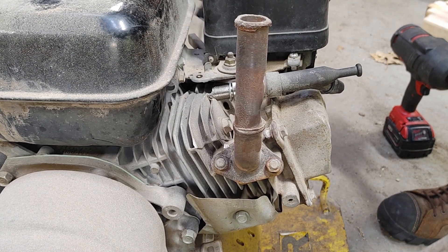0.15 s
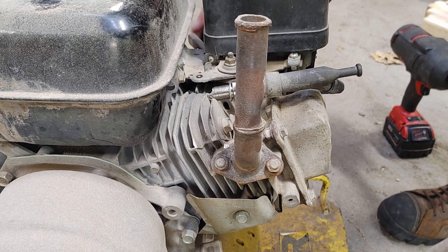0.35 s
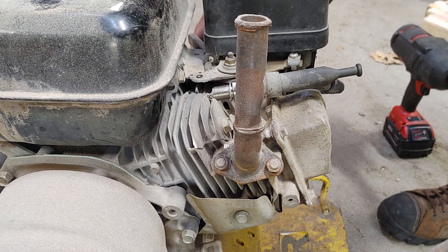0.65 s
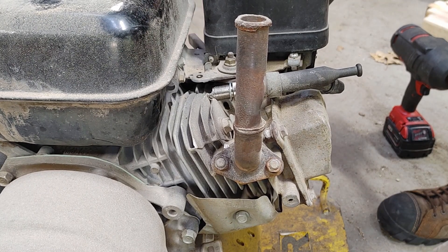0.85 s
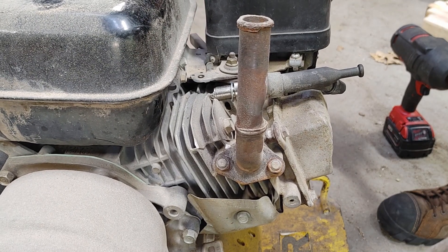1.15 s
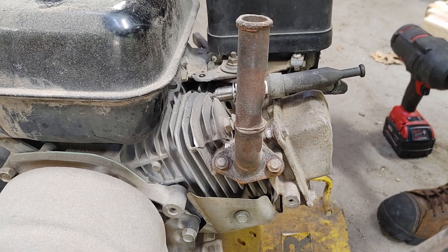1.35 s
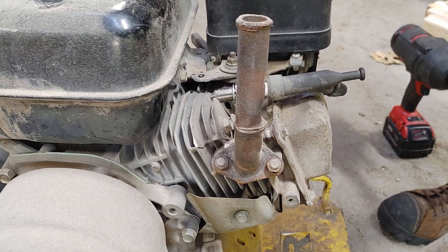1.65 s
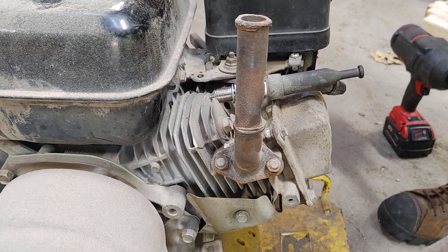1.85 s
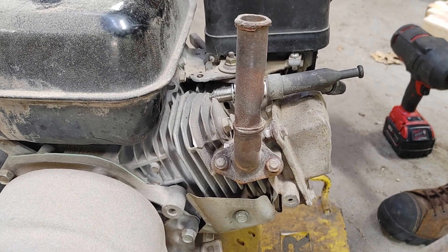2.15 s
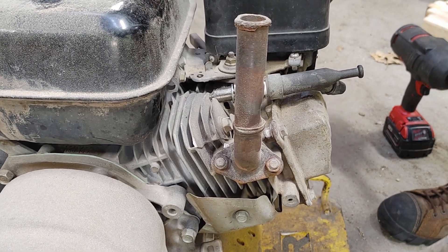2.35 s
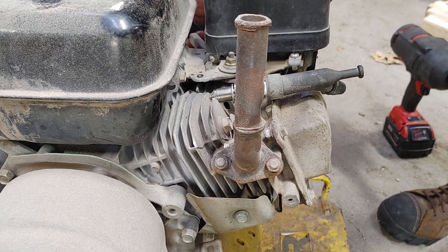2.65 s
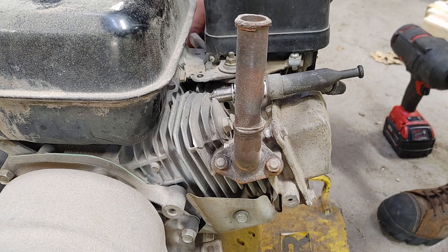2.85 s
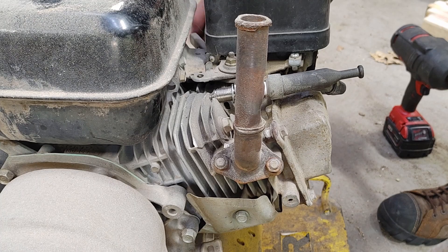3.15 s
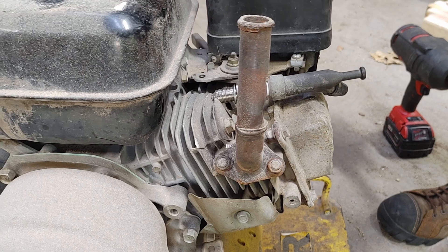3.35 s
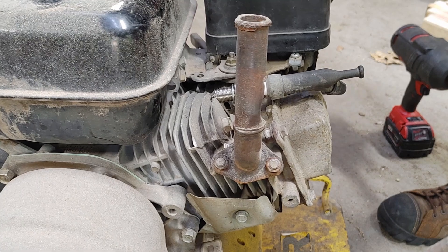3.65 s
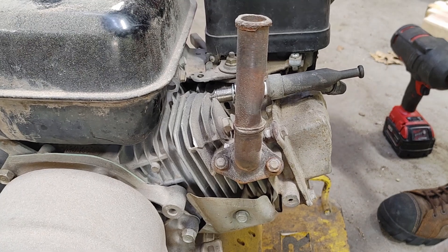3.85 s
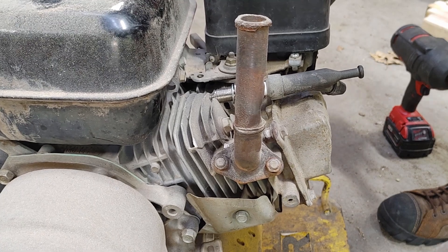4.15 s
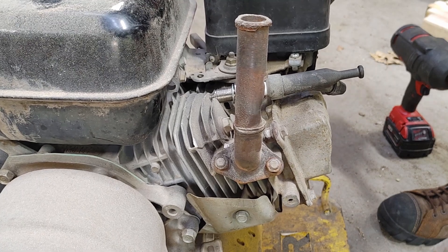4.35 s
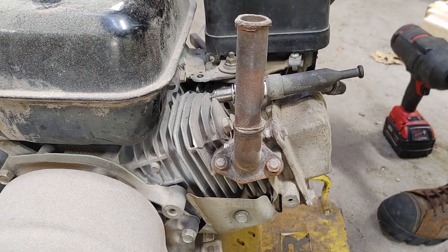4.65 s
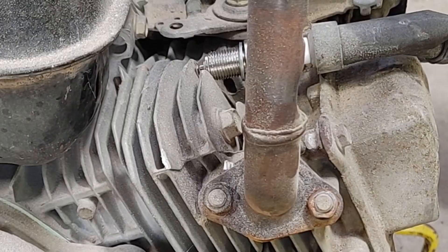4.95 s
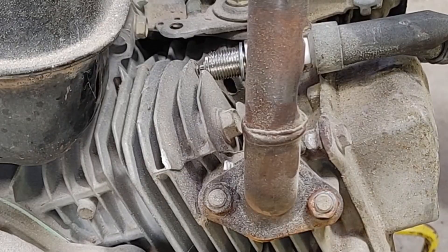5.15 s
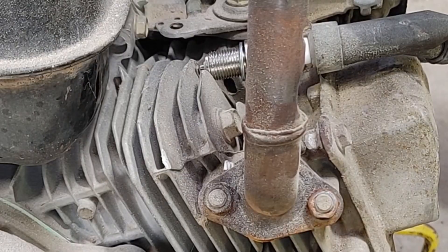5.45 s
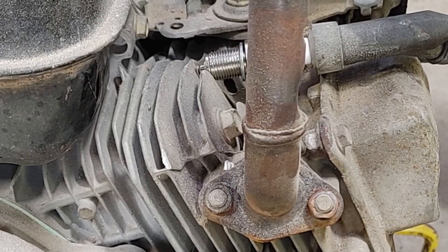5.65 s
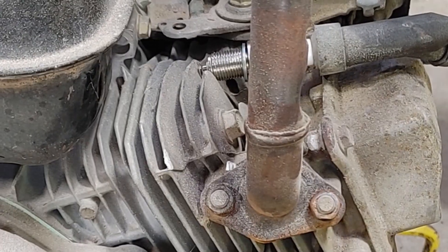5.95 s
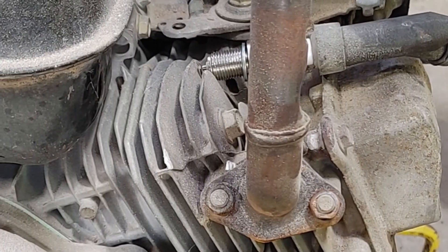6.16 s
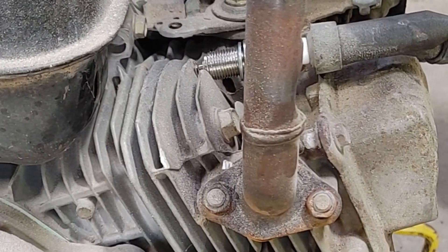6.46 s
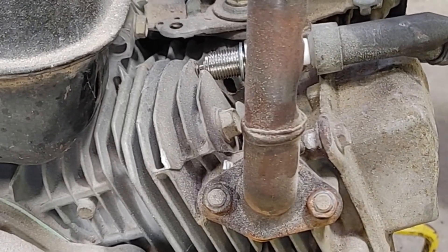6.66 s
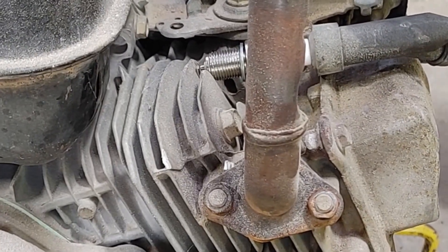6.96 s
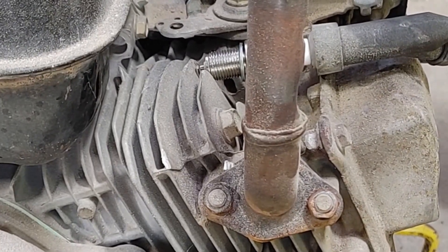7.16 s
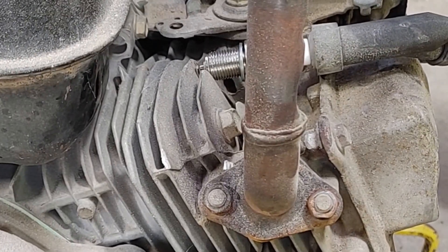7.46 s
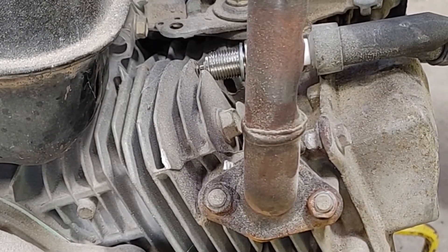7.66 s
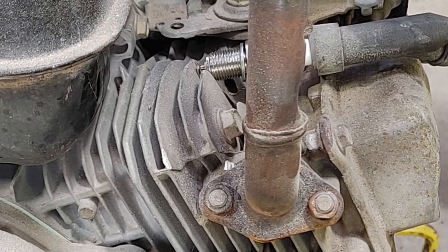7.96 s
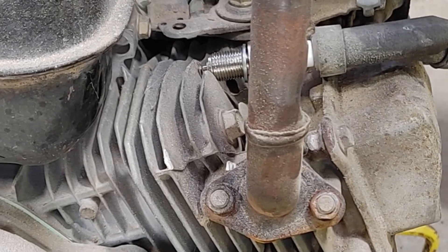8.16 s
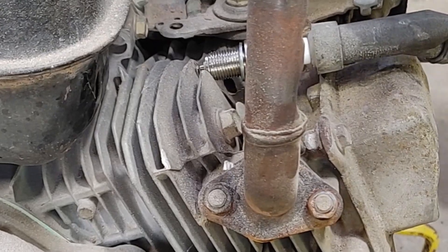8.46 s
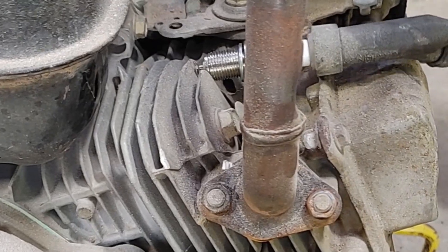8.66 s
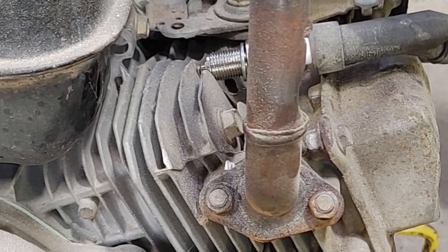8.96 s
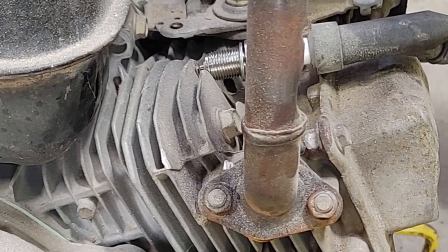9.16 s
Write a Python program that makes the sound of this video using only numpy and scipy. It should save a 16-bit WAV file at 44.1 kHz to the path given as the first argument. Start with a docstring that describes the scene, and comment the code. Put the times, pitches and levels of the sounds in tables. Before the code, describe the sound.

A recoil starter is yanked four times on a small engine that never fires, each pull a metallic clash, rattling whirr and clinking coast-down in a workshop.

```python
"""A small four-stroke engine is pulled over four times by its recoil starter and never fires.
Place: a workshop with a short reverberation and faint building rumble; a two-microphone pair, left first.
The rope tightens with a knock, pawls clash into the steel cup, and the crank whirrs and coasts down.
Each cycle gives a metallic rasp, a few clinks and a soft puff from the open exhaust stub;
the rewinding reel groans. Filtered random contacts make the noises; damped modes make the ringing."""
import sys
import numpy as np
from scipy import signal
from scipy.fft import rfft, irfft, next_fast_len
from scipy.io import wavfile

SR = 44100
rng = np.random.default_rng(int(sys.argv[2]) if len(sys.argv) > 2 else 0)


def bounce(signal):
    """Save signal as a 16-bit WAV file at the path given by the first command-line argument."""
    frames = np.transpose(np.atleast_2d(signal))
    limited = np.clip(frames, -1, 1)
    pcm = np.round(limited * 32767).astype(np.int16)
    wavfile.write(sys.argv[1], SR, pcm)


N = 410558
TIME = np.arange(N) / SR
AIR_DB = -67
CUTOFF_HZ = 16000
FULL_SPEED = 9  # crank cycles per s at which the engine's levels are given


def from_db(db):
    """Amplitude factor of a level in dB."""
    return 10 ** (np.asarray(db) / 20)


def rms_one(x):
    """Scale to an rms of 1."""
    return x / np.sqrt(np.mean(x ** 2) + 1e-20)


def at_hz(points, hz):
    """Read a spectrum on a log-frequency axis."""
    points = np.array(points)
    return np.interp(np.log(hz + 1e-3), np.log(points[:, 0]), points[:, 1])


def add(track, s, sound):
    """Mix a sound into the track from time s on."""
    i = max(round(s * SR), 0)
    track[i:i + len(sound)] += sound[:max(N - i, 0)]


def colour(x, spectrum, resonances=()):
    """Causal filter with a broad spectrum and resonant peaks; white noise keeps its power."""
    size = 2 * next_fast_len(N // 2 + SR // 4)
    hz = np.arange(size // 2 + 1) * SR / size
    db = at_hz(spectrum, hz)
    for centre_hz, width_hz, lift_db in resonances:
        db = db + lift_db / (1 + (2 * (hz - centre_hz) / width_hz) ** 2)
    # folding the cepstrum forward in time gives minimum phase
    cepstrum = irfft(np.log(rms_one(from_db(db))))
    causal = cepstrum * np.r_[1, np.full(size // 2 - 1, 2), 1, np.zeros(size // 2 - 1)]
    return irfft(rfft(x, size) * np.exp(rfft(causal)))[..., :N]


def ring(force, hz, t60):
    """Damped mode: a unit click sets a sine of height 1 ringing, down 60 dB after t60 seconds."""
    radius, angle = 10 ** (-3 / (t60 * SR)), 2 * np.pi * hz / SR
    return signal.lfilter([0, np.sin(angle)], [1, -2 * radius * np.cos(angle), radius ** 2], force + 1e-18)


def drift(rate, size=N):
    """Random wandering with spread near 1, through new values at rate per second."""
    knots = rng.standard_normal(4000)
    return np.interp(TIME[:size] * rate, np.arange(len(knots)), knots)


def contacts(per_s, spread_db):
    """Random tiny impacts of uneven strength, radiating differently in two directions; rms 1."""
    strength_db = spread_db * np.minimum(rng.exponential(1, N), 3)
    sizes = from_db(strength_db) * rng.choice([-1, 1], (2, N))
    return rms_one(sizes * (rng.random(N) < per_s / SR))


# rumble of the building: hz, level_db (per Hz)
AIR_COLOUR = [(25, -16.5), (70, 0), (110, -4.5), (180, -6.5), (300, -4.5), (520, -7), (900, -12),
              (1400, -19), (3000, -19.5), (7000, -28), (9000, -29), (16000, -21.5)]


def room_air(side_db=-8):
    """Faint steady rumble of the building: coloured noise, partly different at the two microphones."""
    mid, side = colour(rng.standard_normal((2, N)), AIR_COLOUR)
    return from_db(AIR_DB) * (mid + from_db(side_db) * side * [[1], [-1]])


# reverberation of the workshop: hz, t60_s
SHOP_T60 = [(100, 0.14), (500, 0.5), (2000, 0.11), (6000, 0.57), (15000, 0.098)]
# how alike the left and right microphones hear: hz, likeness (1 = the same)
LIKENESS = [(100, 0.45), (300, 0.54), (550, 1), (900, 0.15), (1500, 0.25), (2600, 0.044), (15000, 0.032)]


def workshop(pair, room_db, build_s=.008, lead_s=.00009):
    """Both microphones hear the bass more alike than the treble, left first; then the room answers."""
    size = next_fast_len(N)
    likeness = np.clip(at_hz(LIKENESS, np.arange(size // 2 + 1) * SR / size), -1, 1)
    shares = np.sqrt([(1 + likeness) / 2, (1 - likeness) / 2])
    common, apart = irfft(rfft(pair, size) * shares, size)[:, :N]
    right = np.interp(TIME - lead_s, TIME, common - apart)
    direct = np.array([common + apart, right])

    t, echoes = TIME[:SR * 3 // 4], 0
    for low_hz in 60 * 2 ** np.arange(9.):  # octave bands
        edges_hz = [low_hz, min(2 * low_hz, .45 * SR)]
        band = signal.butter(2, edges_hz, "band", fs=SR, output="sos")
        mid, side = signal.sosfilt(band, rng.standard_normal((2, len(t))))
        hz = low_hz * np.sqrt(2)
        alike = np.clip(at_hz(LIKENESS, hz), -1, 1)
        decay_s = at_hz(SHOP_T60, hz) / np.log(1000)
        tail = np.exp(-t / decay_s) * np.minimum(t / build_s, 1) / np.sqrt(decay_s * SR)
        spread = np.sqrt(1 + alike) * mid + np.sqrt(1 - alike) * side * [[1], [-1]]
        echoes = echoes + from_db(room_db) * tail * spread
    room = signal.fftconvolve(echoes, pair[:1], axes=1)[:, :N]
    return (direct + room) / np.sqrt(1 + from_db(room_db) ** 2)


# faint rustles of hand and rope: start_s, level_db
RUSTLES = [(0.037, -50), (.066, -55), (.11, -53), (0.14, -57), (0.589, -56), (2.949, -55.5), (4.668, -49.5),
           (4.915, -52), (5.241, -57.5), (5.46, -50), (5.495, -39), (7.095, -49), (7.19, -52), (7.294, -50),
           (7.411, -56.5), (7.669, -53.5)]


def rustles(rise_s=0.012, fade_s=0.022):
    """The hand shifts its grip and the rope brushes the shroud: brief swells of random contacts."""
    touch, t = np.zeros(N), TIME[:SR // 5]
    for s, db in RUSTLES:
        add(touch, s, from_db(db) * np.minimum(t / rise_s, 1) * np.exp(-t / fade_s))
    spectrum = [(200, 5.0), (1500, 2.5), (7000, -2.5), (8500, -8.5), (16000, -6.5)]  # hz, level_db
    return colour(touch * contacts(per_s=6500, spread_db=6.0), spectrum)


# thin squeaks of dry steel: start_s, length_s, first_hz, middle_hz, last_hz, level_db
SQUEAKS = [(3.796, .014, 9700, 13000, 15500, -30.5), (4.088, .04, 10400, 12800, 10300, -40.5),
           (6.191, .011, 10000, 12800, 15200, -29), (6.472, .037, 10200, 13500, 10200, -31)]


def squeaks(gain_db=0.0, waver=.03, rough_db=4.0):
    """The pitch of a squeak follows the sliding speed in one quick arc."""
    out = np.zeros(N)
    for s, length_s, *pitches_hz, db in SQUEAKS:
        size = int(length_s * SR)
        along = np.linspace(0, 1, size)
        arc_hz = np.polyval(np.polyfit([0, .5, 1], pitches_hz, 2), along)
        hz = arc_hz * (1 + waver * drift(rate=1500, size=size))
        swell = np.sqrt(4 * along * (1 - along))
        level = from_db(db + gain_db + rough_db * drift(rate=400, size=size)) * swell
        add(out, s, level * np.sin(2 * np.pi * np.cumsum(hz) / SR))
    return out


# groans of the reel: start_s, end_s, first_hz, last_hz, level_db
GROANS = [(1.93, 2.01, 576, 482, -44), (2.35, 2.413, 420, 366, -51), (2.03, 2.146, 391, 533, -37),
          (3.57, 3.655, 388, 592, -26), (4.13, 4.206, 370, 325, -47.5), (4.19, 4.275, 390, 577, -30.5),
          (4.37, 4.444, 555, 436, -36), (4.514, 4.587, 326, 400, -41), (4.585, 4.651, 415, 438, -51.5),
          (5.876, 5.963, 311, 372, -32.5), (6.585, 6.635, 433, 530, -27.5), (6.852, 6.926, 378, 469, -30),
          (8.06, 8.235, 304, 411, -36.5), (8.87, 8.987, 329, 374, -40), (9.117, 9.228, 387, 496, -41.5)]


def groans(waver=0.021, rough_db=1.0, overtone_db=-15, gain_db=0.0):
    """The reel sticks and slips on its spindle in short gliding notes."""
    out = np.zeros(N)
    wobble, grain = 1 + waver * drift(rate=120), from_db(rough_db * drift(rate=450))
    for start, end, first_hz, last_hz, db in GROANS:
        span = (TIME >= start) & (TIME < end)
        hz = np.linspace(first_hz, last_hz, span.sum()) * wobble[span]
        phase = 2 * np.pi * np.cumsum(hz) / SR
        swell = np.sqrt(np.hanning(span.sum())) * grain[span]
        note = np.sin(phase) + from_db(overtone_db) * np.sin(2 * phase)
        out[span] += from_db(db + gain_db) * swell * note
    return out


# the recoil spring sings where the reel rubs it; the 7450 Hz row is the cup singing as the pawls let go:
# start_s, end_s, pitch_hz, level_db, fade_db_per_s
SPRING = [(1.75, 2.38, 4155, -40, 20.5), (1.898, 2.15, 1366, -38.5, 34), (1.95, 2.04, 5500, -42, 62),
          (2.123, 2.599, 2330, -44.5, 43), (3.95, 4.55, 4120, -31, 29), (4.05, 4.85, 2350, -36, 27.5),
          (4.192, 4.6, 1374, -37, 26), (4.5, 4.799, 3620, -58.5, 37), (6.3, 6.85, 4090, -38, 25),
          (6.35, 7.106, 2340, -44, 24), (6.75, 6.98, 5475, -42, 70), (6.777, 7.023, 1380, -26.5, 76),
          (6.855, 7.06, 3590, -48.5, 57.5), (8.56, 8.7, 7450, -28, 58), (8.6, 9.198, 4135, -33, 32),
          (8.604, 9.4, 2350, -26.5, 30), (8.854, 9.3, 1390, -37, 30), (9.03, 9.3, 5475, -51, 42)]


def singing(waver_db=1.5, wander=.55, grit=.5, attack_s=.025, decay_s=.11):
    """The rubbed spring sings with a gritty, wavering tone, then rings out."""
    out, size = np.zeros((2, N)), SR * 5 // 4
    t = TIME[:size]
    for start, end, hz, db, fade_db_per_s in SPRING:
        rubbed = np.minimum(t / attack_s, 1) * np.exp(-np.maximum(t - (end - start), 0) / decay_s)
        shape = rubbed * from_db(db - fade_db_per_s * t + waver_db * drift(rate=45, size=size))
        for k, side in enumerate(out):
            unsteady = wander * drift(rate=35, size=size) + grit * drift(rate=300, size=size)
            phase = k * np.pi / 2 + unsteady  # radians
            add(side, start, shape * np.sin(2 * np.pi * hz * t + phase))
    return out


# clacks of the handle, rope guide and reel: start_s, pitch_hz, level_db, fade_s
CLACKS = [(.137, 2340, -62, 0.032), (0.14, 1090, -49.5, 0.014), (0.172, 910, -54, 0.022),
          (1.319, 2850, -14.5, 0.009), (1.76, 1090, -33, 0.056), (2.081, 2760, -34.5, 0.0071),
          (2.254, 1120, -48, 0.021), (2.629, 752, -59, 0.021), (3.249, 1650, -33, 0.017),
          (3.637, 800, -27.5, 0.038), (3.764, 630, -22, 0.017), (4.279, 1570, -29, 0.009),
          (4.324, 1140, -29.5, 0.016), (4.599, 2810, -34.5, 0.023), (4.733, 1660, -36.5, 0.019),
          (4.76, 783, -45, 0.024), (6.051, 1350, -24.5, 0.028), (6.155, 550, -27.5, 0.028),
          (6.165, 816, -20, 0.018), (6.355, 1450, -26, 0.028), (6.656, 1300, -28, 0.016),
          (6.692, 1124, -28.5, 0.02), (6.84, 2760, -34.5, 0.011), (6.979, 1790, -42.5, 0.016),
          (7.091, 642, -26, 0.0083), (7.962, 1540, -29, 0.015), (8.001, 1460, -24, 0.0074),
          (8.282, 2610, -26, 0.013), (8.511, 2950, -17, 0.007), (8.802, 1350, -22.5, 0.0097),
          (8.822, 1124, -18.5, 0.0081), (8.885, 860, -32, 0.01), (8.942, 607, -37, 0.018),
          (9.218, 2760, -35.5, 0.013)]


def clacks(width=0.056, rise_s=0.0012, gain_db=3.5):
    """Short pitched taps, each a noise burst through one damped resonance."""
    out, t = np.zeros(N), TIME[:SR // 5]
    for s, hz, db, fade_s in CLACKS:
        edges_hz = [hz / (1 + width), hz * (1 + width)]
        band = signal.butter(2, edges_hz, "band", fs=SR, output="sos")
        shape = np.minimum(t / rise_s, 1) * np.exp(-t / fade_s)
        tap = shape * signal.sosfilt(band, rng.standard_normal(len(t)))
        add(out, s, from_db(db + gain_db) * rms_one(tap) * np.sqrt(np.mean(shape ** 2)))
    return out


# hollow knocks as the rope tightens or the handle comes home:
# start_s, level_db, tilt_db_per_octave, rise_s
KNOCKS = [(2.997, -17, -2, 0.012), (4.756, -45, -5.5, 0.0064), (4.78, -46, -5, 0.0091),
          (5.326, -23.5, 1, 0.0051), (5.342, -21.5, -5.5, 0.0039), (7.044, -41.5, -9.5, .008),
          (7.064, -38.5, -5.5, .008), (7.09, -29, -10, 0.0025), (7.706, -21.5, -2, 0.0069),
          (7.722, -27.5, -8.5, 0.0066)]
# modes of the plastic shroud: pitch_hz, level_db, fade_s
SHROUD = [(565, -9.5, 0.029), (610, -2, 0.0097), (736, -6.5, 0.0095), (811, -3.5, 0.022), (910, -2, 0.013),
          (1139, -12, .009), (1220, -6.5, .014), (1412, -9, .012), (1580, -14.5, 0.015), (1790, -17, .008),
          (2970, -19.5, 0.008), (3500, -35, .007), (6170, -29, 0.011)]
# spectrum of the scuff: hz, level_db (per Hz)
KNOCK_COLOUR = [(60, -30.5), (330, -10.5), (600, 9), (1400, 7.5), (2200, -13), (5000, -25), (7000, -24),
                (10000, -38.5), (15000, -50.5)]


def knocks(gain_db=0.0, tail_db=-18, tail_s=0.067, scuff_db=-5, scuff_s=0.0062, pivot_hz=800):
    """The reel meets its stop with a short scuff; the hollow shroud thuds and leaves a blurred tail."""
    out, scuff, size = np.zeros((2, N)), np.zeros(N), SR // 2
    t = TIME[:size]
    for s, db, tilt_db, rise_s in KNOCKS:
        press = np.sin(np.pi / 2 * np.minimum(t / rise_s, 1)) ** 2
        since = np.maximum(t - rise_s, 0)
        add(scuff, s, from_db(db + scuff_db + tilt_db) * press * np.exp(-since / scuff_s))
        for hz, mode_db, fade_s in SHROUD:
            tilt = tilt_db * np.log2(hz / pivot_hz)
            level = from_db(db + gain_db + mode_db + tilt) * press
            thud = np.exp(-since / fade_s)
            # the tail is shorter in the treble
            tail = from_db(tail_db) * np.exp(-since / (tail_s * min(1, pivot_hz / hz)))
            for side in out:
                phase = 2 * np.pi * (hz * t + rng.random())
                blurred = drift(rate=hz / 6, size=size) * np.sin(phase)
                blurred = blurred + drift(rate=hz / 6, size=size) * np.cos(phase)
                add(side, s, level * (thud * np.sin(phase) + tail * blurred))
    return out + colour(scuff * contacts(per_s=4300, spread_db=-0.5), KNOCK_COLOUR)


# dry snaps, most of them as the rubbing parts let go: start_s, level_db
SNAPS = [(1.591, -27), (1.626, -30.5), (1.688, -35), (3.54, -28), (3.74, -20.5), (3.765, -18.5),
         (3.869, -22), (3.892, -21), (4.18, -33), (4.389, -31), (4.456, -33), (5.493, -35), (5.633, -27),
         (5.991, -22.5), (6.165, -20), (6.257, -15.5), (6.395, -36), (6.424, -21), (6.561, -34),
         (6.651, -38), (6.808, -35), (7.978, -25.5), (8.238, -28), (8.294, -34), (8.307, -25), (8.39, -24),
         (8.41, -18), (8.518, -27), (8.741, -32), (8.9, -25), (8.942, -26), (9.128, -27)]


def snaps(gain_db=0.0, rise_s=.002, fade_s=0.0032):
    """Each snap is a very short, bright flurry of contacts that leaves almost no ring."""
    force, t = np.zeros(N), TIME[:SR // 12]
    shape = np.minimum(t / rise_s, 1) * np.exp(-np.maximum(t - rise_s, 0) / fade_s)
    for s, db in SNAPS:
        add(force, s, from_db(db + gain_db) * shape)
    spectrum = [(300, -25.5), (2000, -0.5), (5000, 1.5), (9000, -3), (13000, -0.5), (16000, -5.5)]
    return colour(force * contacts(per_s=9900, spread_db=0.0), spectrum)


# the four pulls, levels before each source's gain: rope_moves_s, rope_taut_s, pawls_let_go_s,
# reel_home_s, reel_db, whirr_db, puff_db, cup_db, cup_extra_db (modes above 6 kHz)
PULLS = [(1.01, 1.17, 1.733, 2.62, -30.5, -29, -39, -32, -20),
         (3.235, 3.265, 3.934, 4.92, -28, -22, -29.5, -25, 2.5),
         (5.597, 5.625, 6.258, 7.16, -26.5, -22, -31, -23.5, -5.5),
         (7.945, 7.965, 8.55, 9.58, -28, -22, -31, -31.5, 11.5)]
# modes of the starter cup: pitch_hz, level_db, t60_s
CUP = [(1803, -12, .9), (2208, -10, .6), (3570, -11, .7), (4156, -7, .8), (6292, -3, .5), (7490, -6, .45),
       (7595, -9, .4), (7907, -8, .5), (8950, -11, .3), (9580, -13, .5), (10480, -13, .35)]


def cup(gain_db=-4.0, split_hz=25.0, twin_db=-8):
    """The cup rings when the pawls leave it; it is not quite round, so each mode beats with a twin."""
    out, t = np.zeros((2, N)), TIME[:SR]
    for hz, mode_db, t60 in CUP:
        mode = from_db(gain_db + mode_db - 60 * t / t60) * np.exp(2j * np.pi * hz * t)
        for _, _, let_go_s, *_, db, extra_db in PULLS:
            beat = 1 + from_db(twin_db) * np.exp(2j * np.pi * (split_hz * t + rng.random()))
            sound = from_db(db + extra_db * (hz > 6000)) * mode * beat
            add(out[0], let_go_s, sound.imag)
            add(out[1], let_go_s, sound.real)
    return out


# the crank gains speed evenly under each pull, then friction slows it evenly:
# start_s, fastest_s, stop_s, top_speed (cycles per s), start_phase (cycles after the exhaust opens)
CRANK = [(1.32, 1.55, 2.567, 6.66, .92), (3.335, 3.82, 4.739, 8.144, .64),
         (5.756, 6.196, 7.059, 9.053, .42), (7.954, 8.468, 9.5, 9.603, .224)]


def crank_speeds():
    """Speed of the crank through each pull, in cycles per second."""
    return [np.interp(TIME, [start, fastest, stop], [0, top, 0]) for start, fastest, stop, top, _ in CRANK]


def passes(phase):
    """Each time the crank passes one phase of its cycle: (s, share of full speed, number of the pull)."""
    rows = []
    for pull, speed in enumerate(crank_speeds()):
        turned = CRANK[pull][-1] + np.cumsum(speed) / SR - phase
        for i in np.flatnonzero(np.diff(np.floor(turned))):
            rows.append((TIME[i], speed[i] / FULL_SPEED, pull))
    return rows


def puffs(pipe_hz=111, rise_s=0.0071, gain_db=-5.0, speed_power=1.7):
    """Each opening of the exhaust valve sets the gas in cylinder and stub swinging, harder at speed."""
    out, t = np.zeros(N), TIME[:SR // 6]
    swing = np.sin(2 * np.pi * pipe_hz * t) * t / rise_s * np.exp(1 - t / rise_s)
    for s, speed, pull in passes(0):
        puff_db = PULLS[pull][6]
        add(out, s, from_db(puff_db + gain_db) * speed ** speed_power * swing)
    return out


# steel rubs on steel once in each cycle: start_s, end_s, level_db
RASPS = [(1.528, 1.623, -38.5), (1.678, 1.737, -36.5), (1.886, 2.006, -43), (2.065, 2.1, -48.5),
         (2.328, 2.421, -59), (3.486, 3.536, -41.5), (3.661, 3.755, -33.5), (3.807, 3.863, -28),
         (3.95, 4.051, -29), (4.074, 4.189, -33), (4.325, 4.458, -42), (4.572, 4.588, -56),
         (5.882, 5.998, -35.5), (6.069, 6.17, -29), (6.198, 6.253, -30), (6.326, 6.425, -33),
         (6.478, 6.558, -31.5), (6.585, 6.608, -40.5), (6.683, 6.804, -40.5), (6.88, 6.932, -50.5),
         (8.09, 8.246, -38), (8.323, 8.404, -28.5), (8.436, 8.508, -26.5), (8.576, 8.64, -25),
         (8.673, 8.75, -30), (8.818, 8.915, -34.5), (9.013, 9.116, -40)]


def rasps(edge_s=.003, fade_s=0.0048, flutter_db=3.5, surge_db=2.5, rub_db=-3.0):
    """Force of steel rubbing on steel, catching and slipping unevenly through each stroke."""
    load, t = np.zeros(N), TIME[:SR // 4]
    for start, end, db in RASPS:
        release = np.exp(-np.maximum(t - (end - start), 0) / fade_s)
        add(load, start, from_db(db) * np.minimum(t / edge_s, 1) * release)
    rubbing = load * contacts(per_s=970, spread_db=1.0)
    return rubbing * from_db(rub_db + flutter_db * drift(rate=210) + surge_db * drift(rate=45))


# loose steel parts clink as the crank turns: peak_s, level_db, tilt_db_per_octave
CLINKS = [(1.166, -18.5, -2), (1.32, -13, -4), (1.355, -11, -0.5), (1.548, -22.5, -6), (1.894, -31, -9),
          (1.942, -19.5, -2.5), (1.9967, -27, -7), (2.4, -49.5, -5), (3.315, -14, -6), (3.402, -20, -2.5),
          (3.509, -24.5, 1.5), (3.6685, -15, 0), (3.703, -13, 0), (3.8142, -22.5, 2), (3.843, -18, -1),
          (3.8685, -17, -4), (4.089, -21.5, -10), (4.143, -23.5, -10), (4.3281, -25, -2), (4.3923, -18, -4),
          (4.455, -27, -9), (5.8799, -10, -4.5), (6.079, -22.5, -5), (6.114, -13, -9), (6.237, -16, -4),
          (6.363, -17.5, -1), (6.528, -13, -2.5), (6.692, -25, -7), (6.7513, -17, -5), (6.81, -23, -8),
          (8.093, -18.5, -10), (8.2387, -24, -1), (8.3597, -19, 7.5), (8.478, -10, -1), (8.8283, -24, -2),
          (8.866, -15.5, -4.5), (9.0259, -21, 0), (9.077, -16.5, -7.5), (9.1256, -23, -9)]
# modes of the loose steel parts: pitch_hz, t60_s, level_db
JINGLE = [(2217, 0.11, -11.5), (2900, 0.084, -17.5), (3903, .14, -7.5), (3956, 0.076, -6),
          (4190, .3, -17.5), (4370, 0.044, -11.5), (5510, 0.38, -17.5), (5970, .22, -19),
          (6306, 0.056, -11), (6360, 0.026, -7.5), (6810, 0.67, -14.5), (6910, 0.035, -5.5),
          (7880, 0.25, -16), (7990, 0.076, -8), (9130, 0.084, -12.5), (10070, .12, -17.5),
          (10560, 0.23, -14), (10650, .04, -16.5), (11000, 0.072, -16), (11500, .035, -13),
          (12100, .09, -24.5), (12400, .05, -11), (13400, 0.032, -18), (14395, .04, -16.5),
          (15200, .02, -14)]
# spectrum of the dry contact sound: hz, level_db (per Hz)
RASP_COLOUR = [(300, -21), (1500, -2), (2300, -7), (4000, -4), (5000, -2), (7000, 6), (8700, -6),
               (11000, -1.5), (13000, -3), (16000, 1.5)]


def steel_parts(clink_db=-8.0, rise_s=0.0013, bounce_s=0.0045, contact_db=-4.5, ring_db=-1.5, pivot_hz=5000):
    """Clinks are quick runs of bounces; they and the rubbing ring the same modes over a dry contact sound."""
    rubbing, bounces, t = rasps(), contacts(per_s=14000, spread_db=2.5), TIME[:SR // 12]
    shape = np.minimum(t / rise_s, 1) * np.exp(-np.maximum(t - rise_s, 0) / bounce_s)

    def force(hz, spot_db=4.0):
        """The contact moves from spot to spot and favours other modes."""
        blows = np.zeros(N)
        for s, db, tilt_db in CLINKS:
            spot = spot_db * rng.standard_normal()
            tilt = tilt_db * np.log2(hz / pivot_hz)
            add(blows, s - rise_s, from_db(db + clink_db + spot + tilt) * shape)
        return rubbing * from_db(spot_db * drift(rate=35)) + blows * bounces

    ringing = 0
    for hz, t60, db in JINGLE:
        even_power = np.sqrt(4 * np.log(1000) / (t60 * SR))  # long and short modes answer noise alike
        ringing = ringing + from_db(db + ring_db) * even_power * ring(force(hz), hz, t60)
    # small parts radiate no bass
    ringing = signal.sosfilt(signal.butter(2, 1100, "high", fs=SR, output="sos"), ringing)
    return ringing + from_db(contact_db) * colour(force(pivot_hz, spot_db=3.5), RASP_COLOUR)


# modes of the tank and frame: pitch_hz, level_db, t60_s
TANK = [(257, -20.5, 0.026), (285.4, -6, 0.27), (303.3, -7.5, 0.41), (479.8, -2, 0.17)]
# clashes of pawls and cup: start_s, housing_clunk_db, steel_crack_db, tank_boom_db
CLASHES = [(1.153, -17, -42, -40.5), (1.167, -27, -24, -22.5), (1.319, -16.5, -15.5, -44),
           (1.332, -9, -20.5, -15), (1.352, -10.5, -12, -37), (1.387, -10, -16.5, -19.5),
           (1.73, -19.5, -16, -36), (1.764, -22.5, -22, -35.5), (3.246, -31, -79, -64),
           (3.266, -32, -35, -29.5), (3.314, -10, -16.5, -20.5), (3.349, -13, -12.5, -14.5),
           (3.767, -22, -26.5, -40), (3.891, -23.5, -18.5, -29), (3.927, -13.5, -10, -34),
           (3.945, -12, -13, -44.5), (4.28, -29, -53, -61), (4.388, -34, -39.5, -66),
           (5.617, -24, -42, -48), (5.677, -15.5, -27, -16), (5.715, -12.5, -12.5, -13.5),
           (5.88, -39, -32, -34), (6.26, -21.5, -17.5, -22.5), (6.286, -18.5, -18, -15),
           (6.357, -16, -27.5, -35.5), (6.424, -32.5, -28, -58), (6.521, -34, -34, -48),
           (6.656, -28.5, -44, -48), (6.749, -27, -27.5, -38), (7.957, -42, -33.5, -58),
           (7.974, -31, -28.5, -39), (7.997, -25, -78, -26), (8.307, -12, -42, -43),
           (8.42, -15, -18, -20.5), (8.512, -16.5, -32, -38), (8.542, -18, -14, -53),
           (8.561, -10.5, -14, -19.5), (8.941, -29, -38, -50)]


def jolts(gain_db=0.0):
    """Each clash snatches at the engine, and its tank booms."""
    out = np.zeros(N)
    for hz, mode_db, t60 in TANK:
        blows = np.zeros(N)
        for s, _, _, boom_db in CLASHES:
            add(blows, s + rng.uniform(0, .004), from_db([boom_db + mode_db + gain_db]))
        out += ring(blows, hz, t60)
    return signal.sosfilt(signal.butter(6, 225, "high", fs=SR, output="sos"), out)


# valve gear taps in every cycle: phase (cycles after the exhaust opens), housing_clunk_db, steel_crack_db
TAPS = [(0, -32.5, -37), (0.199, -24.5, -32), (0.779, -30, -39)]


def valve_taps(db_per_speed_decade=34, scatter_db=-3.0):
    """The valve gear taps three times a cycle, softer as the crank slows: (s, clunk dB, crack dB)."""
    rows = []
    for phase, clunk_db, crack_db in TAPS:
        for s, speed, _ in passes(phase):
            db = db_per_speed_decade * np.log10(speed) + scatter_db * rng.standard_normal()
            rows.append((s, clunk_db + db, crack_db + db))
    return rows


# spectra of the housing clunk and the steel crack: hz, level_db (per Hz)
CLUNK_COLOUR = [(40, -30.5), (150, -20), (210, -22.5), (270, -11.5), (390, 3.5), (500, 1), (700, -6),
                (900, 3.5), (1400, 0.5), (2000, -3), (3200, -5), (6000, -14), (15000, -44.5)]
CRACK_COLOUR = [(200, -21.5), (1500, -2), (3000, -0.5), (5000, -3), (6500, -0.5), (9000, -1), (12000, -3),
                (16000, -13.5)]
# resonances of the fan housing and tank, also heard in the whirr: centre_hz, width_hz, lift_db
HOUSING = [(248, 42, 14), (304, 36, 12), (521, 82, 5), (614, 170, 10), (806, 120, 7.5), (866, 150, 4),
           (917, 20, 3), (1110, 210, 4), (1328, 99, 5.5), (1340, 110, 2), (1577, 140, 5), (1815, 92, 9.5),
           (2160, 35, 3)]


def clashes(clunk_db=4.0, crack_db=2.5, clunk_s=.011, crack_s=0.0075, rise_s=0.0038,
            rattle_db=-22, rattle_s=0.02):
    """A clash or tap is a flurry of bounces: housing boom, steel crack, then loose parts rattling."""
    clunk, crack, t = np.zeros(N), np.zeros(N), TIME[:SR // 3]
    rise = np.minimum(t / rise_s, 1)
    clunk_shape = rise * np.exp(-t / clunk_s)
    crack_shape = rise * (np.exp(-t / crack_s) + from_db(rattle_db) * np.exp(-t / rattle_s))
    for s, low_db, high_db, *_ in CLASHES + valve_taps():
        add(clunk, s, from_db(low_db + clunk_db) * clunk_shape)
        add(crack, s, from_db(high_db + crack_db) * crack_shape)
    bounces = contacts(per_s=8000, spread_db=0.0)
    return colour(clunk * bounces, CLUNK_COLOUR, HOUSING) + colour(crack * bounces, CRACK_COLOUR)


# how loudly the reel runs after each pull: level_db (relative to the pull)
REWINDS_DB = [-11, -1.5, -0.5, -20]


def reel_motion(slack_db=-36, slowing_power=2.17, ease_s=0.38, settle_db=-31, settle_s=0.037):
    """The reel comes up as the rope tightens, runs through the pull, slows winding back, and settles."""
    out = 0
    for (moves, taut, let_go, home, db, *_), rewind_db in zip(PULLS, REWINDS_DB):
        take_up = from_db(np.interp(TIME, [moves, taut], [slack_db, 0])) * (TIME > moves)
        slowing = np.interp(TIME, [let_go, home], [1, 0]) ** slowing_power
        running = slowing * from_db(np.interp(TIME, [let_go, let_go + ease_s], [0, rewind_db]))
        settling = from_db(settle_db) * np.exp(-np.maximum(TIME - home, 0) / settle_s)
        out = out + from_db(db) * take_up * (running + settling)
    return out


# the rope zips through its eyelet as it is snatched: loudest_s, swell_s, level_db
ZIPS = [(1.161, .075, -45), (1.307, 0.061, -25.5), (1.419, .03, -34), (3.174, .012, -45),
        (3.398, 0.018, -30.5), (3.861, 0.035, -32), (4.024, 0.072, -26.5), (5.779, .03, -51),
        (6.39, 0.11, -28), (8.309, 0.042, -26.5), (8.57, 0.041, -20.5)]


def rope_zips(fade_s=0.0082):
    """Level of the rope's hiss: each snatch swells and fades."""
    out = 0
    for s, swell_s, db in ZIPS:
        before = np.maximum((s - TIME) / swell_s, 0) ** 2
        after = np.maximum(TIME - s, 0) / fade_s
        out = out + from_db(db) * np.exp(-np.minimum(before + after, 20))
    return out


def shifting(x, low_hz=300, bands_per_octave=2.5, count=8, patchy_db=2.5, per_s=22):
    """The contact point wanders, so neighbouring resonances swell and fade each on their own."""
    size = next_fast_len(N)
    hz = (np.arange(size // 2 + 1) + 1) * SR / size
    place = np.clip(bands_per_octave * np.log2(hz / low_hz), 0, count - 1)
    spectrum, out = rfft(x, size), 0
    for k in range(count):
        band = irfft(spectrum * np.maximum(1 - abs(place - k), 0), size)[:, :N]
        out = out + band * from_db(patchy_db * drift(rate=per_s))
    return out


# spectra of the gear chatter and the sliding rope: hz, level_db (per Hz)
WHIRR_COLOUR = [(40, -39.5), (170, -21), (215, -22.5), (270, -18), (390, -2), (520, -2), (700, -6.5),
                (900, -2.5), (1400, 0), (2000, -8), (3000, -10.5), (5000, -21), (15000, -36.5)]
HISS_COLOUR = [(300, -31.5), (2000, -0.5), (4000, -1.5), (5000, -3.5), (7000, -4), (10000, -11),
               (16000, -14.5)]


def whirr(gain_db=-5.0, flutter_db=2.5, surge_db=-0.5, gear_power=1.595, reel_hiss_db=-19):
    """Gears and reel chatter into the housing, louder with speed, while the rope slides in its eyelet."""
    reel, gears = reel_motion(), 0
    for speed, pull in zip(crank_speeds(), PULLS):
        whirr_db = pull[5]
        gears = gears + from_db(whirr_db) * (speed / FULL_SPEED) ** gear_power
    unsteady = from_db(gain_db + flutter_db * drift(rate=70) + surge_db * drift(rate=29))
    chatter = contacts(per_s=800, spread_db=1.5) * unsteady * np.hypot(reel, gears)
    hiss_level = np.hypot(from_db(reel_hiss_db) * reel, rope_zips())
    sliding = contacts(per_s=5300, spread_db=6.0) * hiss_level
    return colour(shifting(chatter), WHIRR_COLOUR, HOUSING) + colour(sliding, HISS_COLOUR)


def scene():
    """Place each group before the microphone pair, with its own share of room and left, right levels."""
    centred = np.array([[1], [0]])  # a single signal feeds only the first of the pair
    engine = workshop(whirr() + clashes() + rustles() + groans() * centred, room_db=-3.0)
    steel = workshop(steel_parts() + snaps() + squeaks() * centred, room_db=-16.5)
    shroud = workshop(knocks() + clacks() * centred, room_db=-7.0)
    mix = room_air() + singing() + cup(gain_db=1.5)
    mix = mix + shroud * from_db([[-1.0], [1.0]])
    mix = mix + (jolts() + puffs()) * from_db([[1.2], [-1.8]])
    mix = mix + steel * from_db([[2.8], [1.0]])
    return mix + engine * from_db([[1.4], [.7]])


def record(dry):
    """Peaks beyond full scale are clipped; then the treble above the cutoff is removed."""
    low_pass = signal.ellip(10, .05, 70, CUTOFF_HZ, fs=SR, output="sos")
    return signal.sosfiltfilt(low_pass, np.clip(dry, -1, 1))


dry = scene()
out = record(dry)
bounce(out)
```